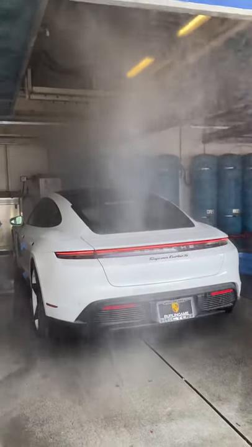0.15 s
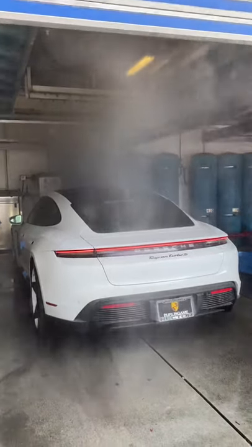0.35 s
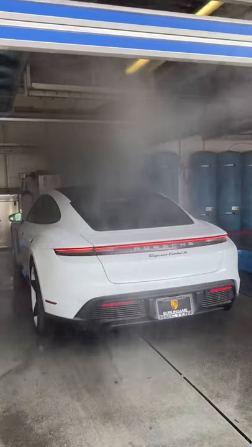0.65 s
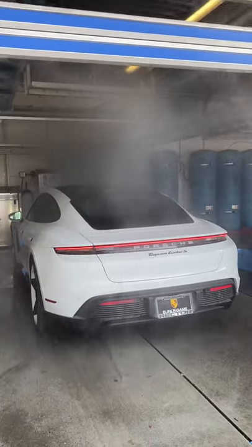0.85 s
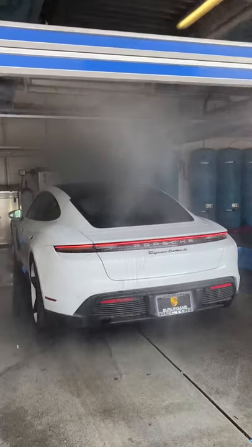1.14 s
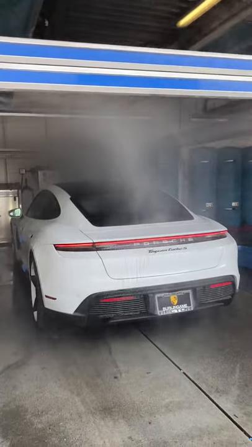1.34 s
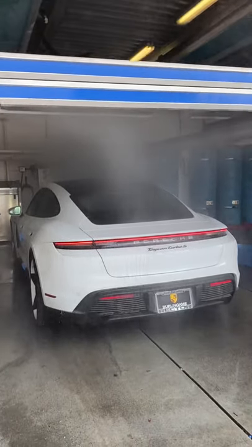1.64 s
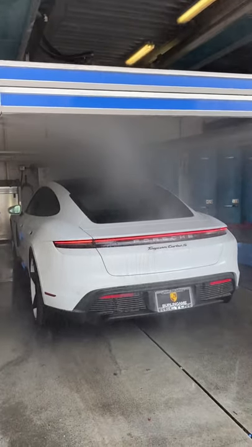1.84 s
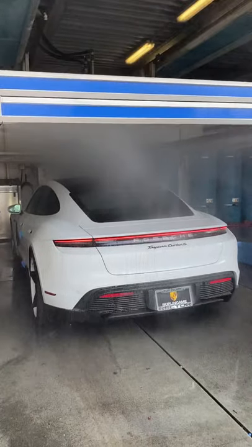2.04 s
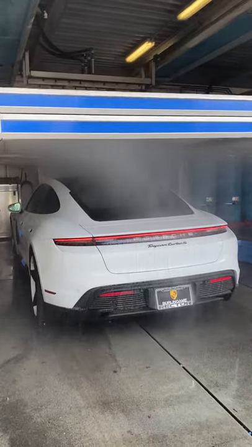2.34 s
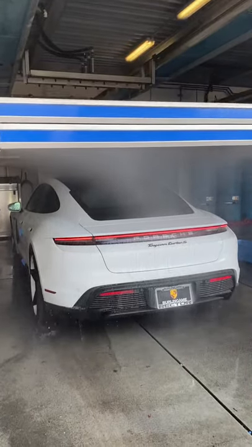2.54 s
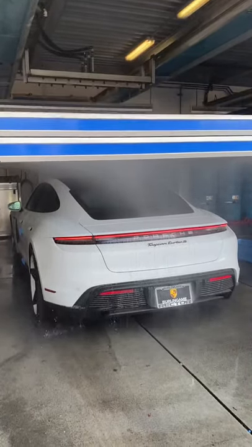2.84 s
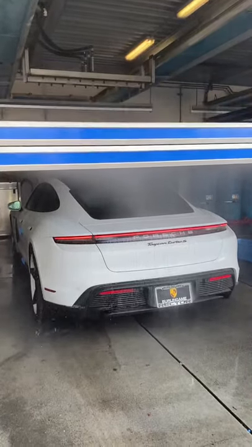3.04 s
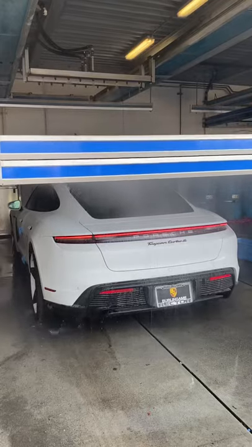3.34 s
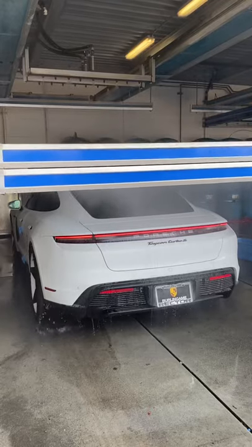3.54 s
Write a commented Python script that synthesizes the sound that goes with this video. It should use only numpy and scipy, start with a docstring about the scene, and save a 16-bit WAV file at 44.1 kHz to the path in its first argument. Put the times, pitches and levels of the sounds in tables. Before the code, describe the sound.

Fine spray hisses and rushes throughout in a car wash bay, flickering slightly after a brief surge at 0.1 s. From about 0.5 s a narrow, wavering jet whistle joins and slowly fades, while breathy blower hums swell and shift. Draught rumbles on the microphone at the entrance, with low puffs around 0.2-0.7 and 2.1-3.0 s. At 3.45 s a tick and rattle precede a heavy, damped clunk.

```python
"""Fine spray hisses on a car in a wash bay, heard from the entrance: coloured noise that flickers band by band.
A narrow noise band wandering in pitch makes the jets' whistle; wider and narrower resonances make the blowers' hum.
Near the end a tick and a rattle (noise bursts) lead to a low clunk, made of blows that ring a damped body.
A draught rumbles and flutters on the microphone as uneven low noise, with single short puffs as buffets."""
import sys
import numpy as np
from scipy import signal
from scipy.fft import rfft, irfft
from scipy.io import wavfile
from scipy.ndimage import uniform_filter1d

SR = 44100
rng = np.random.default_rng(int(sys.argv[2]) if len(sys.argv) > 2 else 0)


def master_out(mix):
    """Clip the mix to full scale and print it as 16-bit PCM to the path in sys.argv[1]."""
    frames = np.transpose(np.atleast_2d(mix))
    ceiling = np.clip(frames, -1, 1)
    pcm = np.round(ceiling * 32767).astype(np.int16)
    wavfile.write(sys.argv[1], SR, pcm)


N = 162288


def undb(db):
    """Turn decibels into a gain."""
    return 10 ** (np.asarray(db) / 20)


def unit(x):
    """Scale a sound to an rms (average strength) of 1."""
    return x / np.sqrt(np.mean(x ** 2))


def curve(table, axis=1):
    """Read one column of a time table at every sample, with straight lines between rows."""
    rows = np.array(table)
    return np.interp(np.arange(N) / SR, rows[:, 0], rows[:, axis])


def over_hz(table):
    """Read a (frequency [Hz], value) table at every spectral bin, on a logarithmic pitch scale."""
    rows = np.array(table)
    bins_hz = np.fft.rfftfreq(N, 1 / SR) + 1  # 1 Hz is added to avoid log(0)
    return np.interp(np.log(bins_hz), np.log(rows[:, 0]), rows[:, 1])


def colour(x, table):
    """Filter by a (frequency [Hz], level [dB]) table, falling 12 dB per octave beyond its ends."""
    f = np.fft.rfftfreq(N, 1 / SR) + 1
    skirts = np.minimum(1, np.minimum(f / table[0][0], table[-1][0] / f)) ** 2
    return irfft(rfft(x) * undb(over_hz(table)) * skirts, N)


def noise(table):
    """Make noise of the given colour, with rms 1."""
    return unit(colour(rng.standard_normal(N), table))


def resonance(hz, width):
    """Turbulent noise in a steep resonance, rms 1; about one width off centre it is 12 dB down."""
    f = np.fft.rfftfreq(N, 1 / SR) + 1
    off = (f * f - hz * hz) / (f * width * 2)
    return unit(irfft(rfft(rng.standard_normal(N)) / (1 + off ** 2) ** 2, N))


def walk(rate):
    """Smooth random wandering with a spread near 1, held between -2 and 2; a higher rate is faster."""
    span = max(int(SR / rate), 2)
    smooth = uniform_filter1d(rng.standard_normal(N), span, mode="wrap")
    smooth = uniform_filter1d(smooth, span, mode="wrap")
    return 2 * np.tanh(unit(smooth) / 2)


def wide(mid, side):
    """Turn mid (same in both ears) and side (opposite in the ears) into left and right."""
    return np.array([mid + side, mid - side])


def burst(at, attack, t60):
    """Envelope that rises quickly at a given time and dies away by 60 dB every t60 seconds."""
    age = np.maximum(np.arange(N) / SR - at, 0)
    return (1 - np.exp(-(age / attack) ** 2)) * np.exp(-np.log(1000) * age / t60)


def churn(table):
    """Coloured turbulence divided by its own local strength, so that it stays even."""
    even_s = 0.034  # span of the first averaging; the second is half as long
    x = noise(table)
    power = uniform_filter1d(x ** 2, int(even_s * SR), mode="wrap")
    power = uniform_filter1d(power, int(even_s * SR / 2), mode="wrap")
    return x / np.sqrt(power)


def spray():
    """Air rush and spray hiss rise, fall and flicker band by band; fine mist follows the top band."""
    # colours of the rush, shared by both ears and opposite in them: (frequency [Hz], relative level [dB])
    mid_colour = [(350, -25), (480, -12.5), (600, -5), (694, -1), (1100, -4.5), (1250, -3.5), (1370, -3.5),
                  (1530, -1.5), (1770, -4), (1950, -1.5), (2150, -4), (3180, -11.5), (4100, -7.5),
                  (4640, -8.5), (5110, -5), (6840, -12), (9740, -14.5), (11000, -19.5), (14300, -92),
                  (22000, -120)]
    side_colour = [(410, -38), (720, -7), (847, -14), (1000, -17), (1180, -8), (1360, -16), (1690, -24),
                   (1950, -13), (2650, -10), (3610, -16), (4470, -8), (4860, 1), (5100, -2), (5480, -13),
                   (5950, -18), (12000, -13), (15600, -43), (22000, -120)]
    # colour of the finest mist: (frequency [Hz], relative level [dB])
    mist_colour = [(7000, -13), (10000, -3), (12500, 0), (14000, 6), (15700, 3), (17000, -4)]
    # how the rush leans to one side: (frequency [Hz], left minus right [dB])
    lean_table = [(300, 21), (700, 3.5), (1150, 2.5), (1500, -0.5), (2500, -1.1), (4900, -2.5), (5500, -1)]
    # centres of the overlapping bands, from low air to high hiss [Hz]
    bands_hz = (1000, 1900, 3500, 5000, 7500)
    # strength of each band, used relative to its median: (time [s], then five band levels [dB])
    flow_table = [(0.0, -45.5, -38.5, -39.5, -43.5, -43), (0.11, -37.5, -38.5, -42, -41, -41),
                  (0.13, -40.5, -42, -43, -47, -45.5), (0.25, -46, -42, -45.5, -45, -48.5),
                  (0.47, -45, -45, -44.5, -47, -45.5), (0.74, -42, -40, -45, -44, -46),
                  (0.94, -45, -38.5, -45, -44, -45), (1.09, -42.5, -41, -46, -44.5, -46.5),
                  (1.8, -41.5, -40.5, -45.5, -42.5, -47), (2.28, -43, -40, -46, -43.5, -46),
                  (3.42, -42.5, -41.5, -45.5, -41.5, -47)]
    mid_db, side_db, mist_db, flicker_db = -36, -37, -40, 1.47  # before flow and lean

    flow = []
    for k in range(len(bands_hz)):
        level_db = curve(flow_table, axis=k + 1)
        flow.append(undb(level_db - np.median(level_db)))

    rush = wide(noise(mid_colour) * undb(mid_db), noise(side_colour) * undb(side_db))
    spectrum = rfft(rush) * undb(wide(0, over_hz(lean_table) / 2))
    out = 0
    for gain, share in zip(flow, np.eye(len(flow))):
        # each share is 1 at its own band centre and slopes to 0 at the neighbours
        band = irfft(spectrum * over_hz(list(zip(bands_hz, share))), N)
        out = out + band * gain * undb(flicker_db * walk(54))
    mist = noise(mist_colour) * undb(mist_db + .5 * walk(20))
    return out + flow[-1] * wide(0, mist)


def whistle():
    """A narrow hiss of the jets that steps in, wanders in pitch and fades."""
    centre_hz, width_hz, waver_hz = 5086, 270, 90
    start_db, fade_db_per_s, pan_db = -47.5, 2, 8.5  # pan is left minus right
    start_s, rise_s = .48, .03
    age = np.maximum(np.arange(N) / SR - start_s, 0)
    # turning the phase of the analytic (complex) hiss shifts its pitch up and down
    drift = np.exp(2j * np.pi * np.cumsum(waver_hz * walk(10)) / SR)
    hiss = np.real(signal.hilbert(resonance(centre_hz, width_hz)) * drift)
    gain = np.minimum(age / rise_s, 1) * undb(start_db - fade_db_per_s * age)
    return hiss * gain * undb(wide(0, pan_db / 2))[:, None]


def blowers():
    """Blower motor tones, each a noisy resonance that swells and fades around its loudest moment."""
    # (centre [Hz], width [Hz], loudest level [dB], left minus right [dB], loudest at [s], swell half length [s])
    tone_table = [(361, 30, -45.5, 0, 1.9, 0.37), (714, 7.4, -50.5, 2, 1.53, 1.05),
                  (788, 52, -53, 6, 2.3, 2.5), (1170, 15, -46.5, 6.5, 2.72, 1.3),
                  (1548, 13, -47.5, 3.5, 3.9, 1.9), (1683, 16, -50, -2, 4.3, 1.2),
                  (1913, 15, -50.5, 1, 1.3, 1.26)]
    swell_db = 12.5  # how far a tone sinks away from its loudest moment
    t, out = np.arange(N) / SR, 0
    for hz, width, db, pan_db, at, half in tone_table:
        tone = wide(resonance(hz, width), 0.081 * resonance(hz, width))
        swell = swell_db * (np.exp(-((t - at) / half) ** 2 / 2) - 1)
        out = out + tone * undb(db + swell) * undb(wide(0, pan_db / 2))[:, None]
    return out


def rattle():
    """Quick knocks shake noisy resonances, and a sharp tick marks the first knock."""
    # knocks: (time [s], level [dB])
    knock_table = [(3.4447, -4), (3.45, -9), (3.4605, -1)]
    # resonances of the rattling part: (centre [Hz], width [Hz], level [dB])
    part_table = [(510, 190, -16), (792, 255, -20), (1570, 290, -31)]
    attack_s, rattle_t60_s = 0.0017, 0.062
    tick_hz, tick_width_hz, tick_db, tick_t60_s = 3400, 1600, -28, .095
    shake = sum(undb(db) * burst(at, attack_s, rattle_t60_s) for at, db in knock_table)
    body = 0
    for hz, width, db in part_table:
        body = body + undb(db) * wide(resonance(hz, width), 0.5 * resonance(hz, width))
    tick = wide(resonance(tick_hz, tick_width_hz), 0.83 * resonance(tick_hz, tick_width_hz))
    return shake * body + tick * undb(tick_db) * burst(knock_table[0][0], attack_s, tick_t60_s)


def clunk():
    """Heavy blows push on a damped body, which rings in its modes, and make loose parts shudder."""
    # blows: (centre [s], relative level [dB], contact length [s])
    blow_table = [(3.4657, -7, 0.0011), (3.4738, 5, 0.0034), (3.491, -9, 0.006)]
    # modes of the struck body: (frequency [Hz], relative level [dB], time to fall 60 dB [s])
    mode_table = [(70, -10, 0.16), (120, -15.5, 0.095), (179, -18, 0.066), (293, -16, 0.31),
                  (425, -6, 0.12), (573, -17, 0.047), (700, -15, .06)]
    # colour of the shuddering loose parts: (frequency [Hz], relative level [dB])
    shudder_colour = [(60, -5), (130, -5), (400, -6), (650, -24), (1000, -24.5)]
    ring_db, low_cut_hz = 1.5, 26
    shudder_db, shudder_attack_s, shudder_t60_s = -23, 0.0033, 0.17
    t = np.arange(N) / SR
    push, jolt = 0, 0
    for at, db, contact in blow_table:
        pulse = np.exp(-(2 * (t - at) / contact) ** 2 * 2)
        push = push + undb(db) * pulse / pulse.sum()
        jolt = jolt + undb(db) * burst(at - contact, shudder_attack_s, shudder_t60_s)
    ring = 0
    for hz, db, t60 in mode_table:
        ring = ring + undb(db) * np.exp(-np.log(1000) * t / t60) * np.cos(2 * np.pi * hz * t)
    thud = undb(ring_db) * signal.fftconvolve(push, ring)[:N]
    thud = thud + undb(shudder_db) * jolt * noise(shudder_colour)
    return signal.sosfilt(signal.butter(2, low_cut_hz, "highpass", fs=SR, output="sos"), thud)


def draught():
    """Moving air rumbles and flutters on the microphone, and eddies push its two sides opposite ways."""
    # strength of the draught: (time [s], rumble level [dB], flutter level [dB])
    draught_table = [(0, -46, -43), (.06, -43.5, -61), (.13, -42.5, -42), (.25, -51, -56.5),
                     (.42, -44, -53), (.58, -38, -52), (.72, -38, -41), (.8, -44, -50.5), (.91, -41, -57),
                     (1.05, -46, -42), (1.4, -43, -39.5), (1.85, -31.5, -36.5), (2.15, -36.5, -39.5),
                     (2.47, -35, -40), (2.52, -42.5, -42.5), (2.8, -38.5, -40), (3.12, -39, -45.5),
                     (3.42, -49.5, -47.5), (3.54, -29, -38.5), (3.68, -30.5, -38)]
    # colours of rumble and flutter: (frequency [Hz], relative level [dB])
    rumble_colour = [(22, -34), (38, -6.5), (56, 1.5), (75, 3), (95, -7.5), (120, -4.5), (170, -18),
                     (300, -67)]
    flutter_colour = [(80, -6.5), (140, -0.5), (220, 0), (380, -2.5), (550, -8.5), (800, -20), (1500, -51)]
    # strength of the eddies before their boost: (time [s], level [dB])
    eddy_table = [(0, -39), (.25, -37), (.5, -44), (.6, -35.5), (.9, -37), (1.2, -53.5), (1.8, -52.5),
                  (2.38, -56), (2.5, -35.5), (2.6, -47), (3.05, -53), (3.35, -63), (3.68, -57)]
    # colour of the eddies: (frequency [Hz], relative level [dB])
    eddy_colour = [(30, -12), (80, 7), (150, 2), (400, -1.5), (720, -4), (950, -13), (1500, -52)]
    rumble_rough_db, flutter_rough_db, eddy_rough_db = 1.6, 2.2, 2  # random unevenness
    eddy_boost_db = 1.5
    rumble_db = curve(draught_table, axis=1) + rumble_rough_db * walk(31)
    flutter_db = curve(draught_table, axis=2) + flutter_rough_db * walk(52)
    eddy_db = curve(eddy_table) + eddy_boost_db + eddy_rough_db * walk(50)
    rumble = churn(rumble_colour) * undb(rumble_db)
    flutter = churn(flutter_colour) * undb(flutter_db)
    eddies = churn(eddy_colour) * undb(eddy_db)
    return wide(rumble + flutter, eddies)


def buffets():
    """Single eddies hit the microphone as short low puffs of noise, some reaching higher in pitch."""
    # (centre [s], level [dB], upper edge [Hz], half length [s])
    puff_table = [(0.231, -32, 78.4, 0.011), (0.291, -33.5, 80, 0.0068), (0.368, -36, 79, 0.012),
                  (0.531, -35, 380, 0.012), (0.582, -27, 80, 0.007), (0.648, -27, 124, 0.016),
                  (0.704, -31, 189, 0.0051), (2.113, -28, 100, 0.011), (2.295, -32, 100, 0.016),
                  (2.444, -27.5, 167, 0.021), (2.493, -29.5, 310, .009), (2.836, -25.5, 157, 0.0035),
                  (2.872, -25, 345, 0.0028), (2.882, -23, 382, 0.0027), (3.002, -26, 168, 0.0088),
                  (3.03, -21.5, 273, 0.0078), (3.663, -30, 160, 0.0096)]
    low_hz, octave_fall_db = 61.6, -18  # lower edge; change in the octave over the upper edge
    side_db = -17  # share that is opposite in the two ears
    t, out = np.arange(N) / SR, 0
    for at, db, hz, half in puff_table:
        swell = np.exp(-((t - at) / half) ** 2 / 2)
        shape = [(low_hz, 0), (hz, 0), (2 * hz, octave_fall_db)]
        mid = unit(swell * noise(shape))
        side = unit(swell * noise(shape))
        # the rms of the swell makes the level hold for the puff rather than the whole scene
        out = out + wide(mid, undb(side_db) * side) * undb(db) * np.sqrt(np.mean(swell ** 2))
    return out


def scene():
    """Add everything in the bay; the microphone passes little of the wind below 40 Hz."""
    wind_cut = signal.butter(4, 40, "highpass", fs=SR, output="sos")
    wind = signal.sosfilt(wind_cut, draught() + buffets())
    return spray() + whistle() + blowers() + rattle() + clunk() + wind


def record(dry):
    """The recorder cuts the highest treble with a steep low-pass filter."""
    top_hz = 15700
    return signal.sosfilt(signal.ellip(10, .2, 80, top_hz, fs=SR, output="sos"), dry)


dry = scene()
out = record(dry)
master_out(out)
```